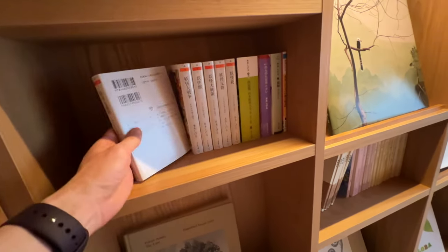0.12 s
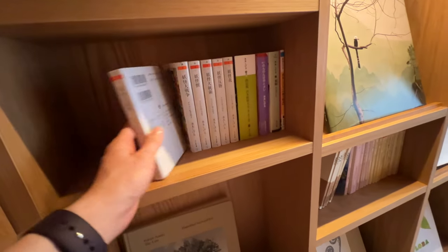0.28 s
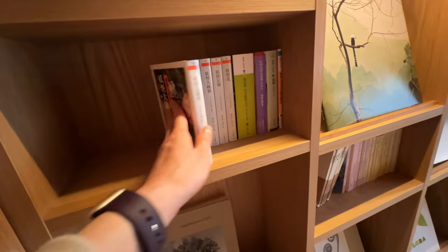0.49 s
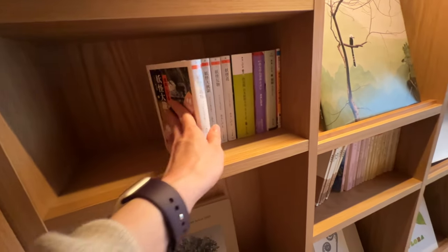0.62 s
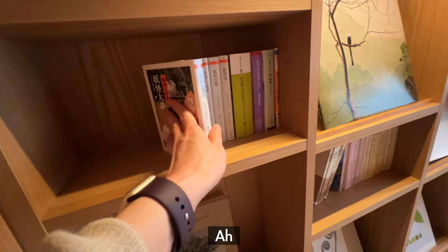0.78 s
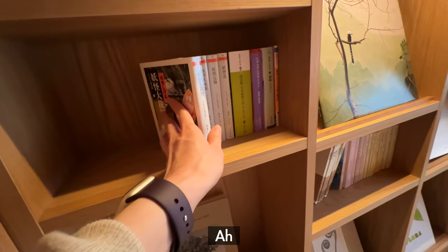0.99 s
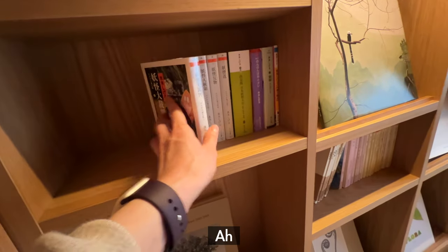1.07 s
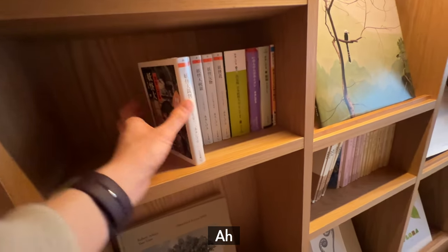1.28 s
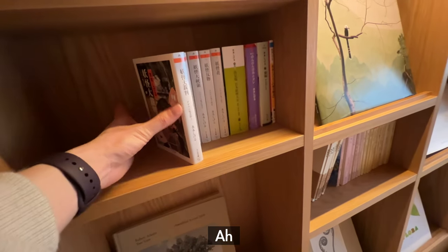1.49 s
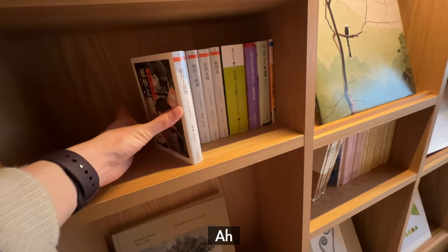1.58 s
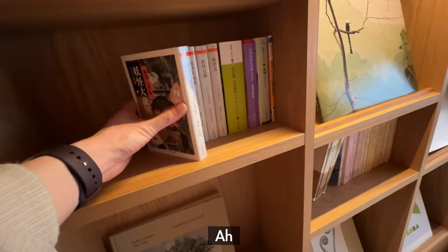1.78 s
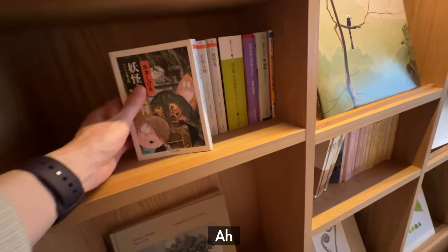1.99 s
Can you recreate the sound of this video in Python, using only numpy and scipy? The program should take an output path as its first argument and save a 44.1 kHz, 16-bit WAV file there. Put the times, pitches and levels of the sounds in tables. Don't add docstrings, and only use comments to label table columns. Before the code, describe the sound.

A paperback scrapes along a wooden shelf. Faint ticks from 0.1 seconds grow into a stuttering run of dull, hollow knocks at 0.2-0.4, loudest near 0.3, with papery rubbing fading by 0.7. A brief soft rub comes around 1.1, faint finger brushes and taps follow, then a longer slide at 1.6-1.95 and light ticks near 2.0. Close stereo, short dry room, low hum.

```python
import sys
import numpy as np
from scipy import signal
from scipy.fft import rfft, irfft, next_fast_len
from scipy.io import wavfile
from scipy.ndimage import uniform_filter1d, map_coordinates

SR = 44100
rng = np.random.default_rng(int(sys.argv[2]) if len(sys.argv) > 2 else 0)


def generate_wav(sig):
    pcm = np.round(np.clip(np.atleast_2d(sig).T, -1, 1) * 32767).astype(np.int16)
    wavfile.write(sys.argv[1], SR, pcm)


def voltage_ratio(decibels):
    exponent = np.asarray(decibels, float) / 20
    return 10 ** exponent


N = 90405
PORTS = np.array([[.5], [-.5]])


def unit(x):
    return x / np.sqrt(np.mean(x ** 2) + 1e-20)


def along(points, hz):
    point_hz, value = np.transpose(points)
    return np.interp(np.log(hz + 1), np.log(point_hz + 1), value)


def shape(points):
    return lambda hz: voltage_ratio(along(points, hz))


def wobble(rate):
    knots = rng.standard_normal(int(N * rate / SR) + 4)
    return map_coordinates(knots, [np.arange(N) * rate / SR])


def filtered(x, response):
    m = next_fast_len(N + SR // 2)
    return irfft(rfft(x, m) * response(np.fft.rfftfreq(m, 1 / SR)), m)[..., :N]


def rush(gain, alike, patchy_db):
    z = signal.stft(rng.standard_normal((2, N)), nperseg=512)[2]
    field = rng.standard_normal(z.shape[1:])
    field = uniform_filter1d(uniform_filter1d(field, 4, 0), 8, 1)
    pair = signal.istft(z * voltage_ratio(patchy_db * unit(field)), nperseg=512)[1][:, :N]

    def mid_side(hz):
        turn = np.arccos(np.clip(along(alike, hz), -1, 1)) / 2
        return gain(hz) * [np.cos(turn), np.sin(turn)]

    mid, side = filtered(pair, mid_side)
    return unit(np.array([mid + side, mid - side]))


def ring(modes, t, scatter):
    total = 0
    for (hz, db, t60, rise, pan_db, swing), extra_db in zip(modes, scatter):
        decay = voltage_ratio(db + extra_db + PORTS * pan_db - 60 * t / t60)
        total = total + swing * decay * (1 - np.exp(-t / rise)) * np.sin(2 * np.pi * hz * t)
    return total


# frequency in Hz, level in dB, t60 in seconds, rise in seconds,
# left over right in dB, swing at the start (sign, no unit).
AIR_MODES = [(115, -22, .1, .004, 0, 1), (200, -14, .06, .002, 2, 1), (285, -10, .035, .002, 0, 1),
             (352, 0, .075, .003, 2.5, 1), (420, -3, .07, .003, -5, -1), (610, -11, .035, .0012, -4, 1)]
BOARD_MODES = [(730, -5, .022, .0012, -2, 1), (815, -4, .022, .0012, -1, 1), (910, -11, .04, .0013, 0, 1),
               (1190, -6, .016, .0008, -2, 1), (1430, -9, .014, .0007, -1, 1),
               (1700, -12, .011, .0006, -2.5, 1), (2300, -16, .008, .0005, -2, 1)]
# frequency in Hz, level in dB.
TICK_SPECTRUM = [(800, -11.5), (1500, 12.5), (3000, -6.5), (6000, -6.5), (10000, -8.5), (16000, -16.5)]
# frequency in Hz, correlation (no unit).
SHELF_ALIKE = [(250, .85), (600, 0.23), (1500, 0.6), (5000, 0.077), (9000, 0.96), (16000, 0.33)]


def slips(rows, share_db):
    tick_s, boom_late_s, boom_level_db = 0.0012, .002, -2.5
    ping_level_db, ping_t60 = 6.5, 0.0079
    wood, ticks = np.zeros((2, N + SR)), np.zeros(N + SR)
    t = np.arange(SR // 8) / SR
    late = np.maximum(t - boom_late_s, 0)
    air_count = len(AIR_MODES)
    scatter_db = 2 * rng.standard_normal((len(rows), air_count + len(BOARD_MODES))) + share_db
    for (s, db, tick_db, boom_db, hz), mode_db in zip(rows, scatter_db):
        i = round(s * SR)
        if .37 < s < 1:
            mode_db[4] += 5
            mode_db[3] -= 5
        pings = [(hz * k, tick_db + ping_level_db, ping_t60, .002, 0, 1) for k in (.96, 1.04)]
        knock = ring(BOARD_MODES + pings, t, [*mode_db[air_count:], 0, 0])
        boom = voltage_ratio(boom_level_db + boom_db) * ring(AIR_MODES, late, mode_db)
        wood[:, i:i + len(t)] -= voltage_ratio(db) * (knock + boom)
        ticks[i:i + len(t)] += voltage_ratio(db + tick_db) * (t / tick_s) ** 2 * np.exp(-t / tick_s)
    return wood[:, :N] + ticks[:N] * rush(shape(TICK_SPECTRUM), SHELF_ALIKE, patchy_db=4.5)


# start in seconds, peak in dB, tick in dB, boom in dB, tick pitch in Hz.
LONG_PUSH = [(.199, -25, -1, 6.5, 6073), (.221, -21.5, -2, 8, 2384), (.251, -23.5, -0.5, 8.5, 2370),
             (.277, -11.5, -5.5, 1, 2600), (.297, -7, -16, -3, 2520), (.314, -6, -19, -6, 4485),
             (.329, -7.5, -20.5, -1, 2700), (.34, -13.5, -18, 3, 3580), (.35, -4.5, -22, -8.5, 1980),
             (.357, -13.5, -19, -1.5, 2300), (.365, -10.5, -15.5, -5, 1983), (.372, -26, -17, 7.5, 2475),
             (.383, -31, -15.5, 15.5, 2400), (.394, -19, -26, -11, 2490)]
FIRST_NUDGES = [
    (.095, -47, -5.5, 1.5, 2964),
    (.111, -35.5, -6.5, 0.5, 2210),
    (.121, -42, -4.5, 0.5, 5183),
    (.132, -40.5, 4.5, 4, 3000),
    (.145, -35, 3, 3, 5610),
]
LAST_SHOVES = [
    (1.944, -47.5, -8, 9, 1950),
    (1.966, -35, -0.5, 7, 3030),
    (1.974, -43, -3.5, 6.5, 2040),
    (1.989, -36.5, -0.5, 8.5, 2830),
    (2.0, -42.5, -19, 7.5, 2000),
    (2.015, -34, 4.5, 2, 1480),
    (2.026, -31, -9, 7, 1990),
    (2.037, -32, -5.5, 5, 1530),
]
# level in dB, air modes first, then board modes.
PUSH_SHARE = [0.2, 0.65, 1.2, 1.5, 0.5, 0.33, 0.5, 0.5, 0.5, 0.5, 0.5, 0.5, 0.5]
# level in dB, in the same order.
NUDGE_SHARE = [-0.5, 16, 17.5, -3.5, -4.5, -4.5, -7, 0.5, 7, -3, -10, -3.5, -8.5]
# level in dB, in the same order.
SETTLE_SHARE = [-12, 5, 13.5, 1, -11.5, -3, -2, -9, -17, 3, 12, -1, 0]
# level in dB, in the same order.
SHOVE_SHARE = [-5, 5, -2, 1, 5, -1.5, -6.5, 7, 6, 10, 21, -2, 19]


def pushes():
    first = slips(FIRST_NUDGES, NUDGE_SHARE) + slips(LONG_PUSH, PUSH_SHARE)
    return first + slips(LAST_SHOVES[:3], SETTLE_SHARE) + slips(LAST_SHOVES[3:], SHOVE_SHARE)


# time in seconds, pressure in dB, groan of the compartment in dB,
# singing of the cover in dB.
RUB_STROKES = [
    [(.03, -95.5, 18, 12), (.055, -82, 22, -9), (.085, -71.5, 12.5, 6), (.1, -55.5, 11, 1),
     (.15, -60.5, 6.5, 4.5), (.185, -60, 1.5, 3.5)],
    [(.27, -42, -5.5, -4), (.34, -44.5, 4.5, -36), (.41, -50.5, 11, -45), (.44, -47, 1.5, -20),
     (.48, -49.5, 2, -6), (.53, -69, 14.5, 10.5)],
    [(.56, -57, -1, -2.5), (.65, -57.5, -4.5, 2), (.69, -73, 10.5, 8), (.72, -99, 9, -1)],
    [(.97, -86.5, -5, -3), (.998, -68.5, 12.5, 4), (1.03, -74.5, 14, 5), (1.07, -58, 0, 6.5),
     (1.1, -49.5, -4.5, -4.5), (1.135, -60.5, 0.5, 9.5), (1.16, -72.5, -1.5, -10), (1.21, -96.5, 2, 7.5)],
    [(1.56, -95.5, 19.5, 5), (1.59, -70.5, 2, 3.5), (1.62, -65, 3, 0.5), (1.65, -54.5, -9, -2.5),
     (1.76, -55, -6, 0.5), (1.785, -54.5, -4, 6), (1.84, -53, -8, 8), (1.87, -51.5, -7, -3.5),
     (1.915, -60.5, -8.5, -21), (1.96, -58, 8, 3)],
]
# frequency in Hz, level in dB.
PAPER_SPECTRUM = [(150, -41), (250, -22), (802, -5.5), (1640, -5.5), (2760, -12.5), (9170, -15.5),
                  (14500, -25.5), (15900, -35.5)]
# frequency in Hz, width in Hz, level in dB.
COVER_PEAKS = [(760, 73, -6.5), (1304, 370, 8.5), (2110, 130, 4.5), (2590, 200, -1.5), (3605, 1100, -4)]
# frequency in Hz, width in Hz, level in dB.
FLAT_COVER_PEAKS = [(810, 77, 2), (1300, 220, 7.5), (1930, 70, 1.5), (2160, 89, -3), (2620, 110, -3.5),
                    (2833, 110, 1.5), (4150, 67, -14.5), (6000, 490, -10.5)]
# frequency in Hz, level in dB.
GROAN_SPECTRUM = [(120, -28.5), (200, 3), (270, -7), (380, 2.5), (550, -4.5), (800, -4), (1300, -35)]


def cover_song(peaks):
    def gain(f):
        return sum(voltage_ratio(db) / (1 + (2 * (f - centre) / width) ** 4) for centre, width, db in peaks)
    return rush(gain, SHELF_ALIKE, patchy_db=1)


def rub():
    rub_level_db, sing_level_db, groan_level_db = 3.5, -1.5, -3.5
    t = np.arange(N) / SR
    s, *columns = np.transpose(sum(RUB_STROKES, []))
    press_db, groan_db, sing_db = (np.interp(t, s, column) for column in columns)
    hollow = rush(shape(GROAN_SPECTRUM), SHELF_ALIKE, patchy_db=1.5)
    grain = voltage_ratio(1.6 * wobble(500) + .8 * wobble(60))
    paper = unit(rush(shape(PAPER_SPECTRUM), SHELF_ALIKE, patchy_db=2.5) * grain)
    song = np.where(t < 1.4, cover_song(COVER_PEAKS), cover_song(FLAT_COVER_PEAKS))
    song = unit(song * voltage_ratio(1.5 * wobble(120)))
    singing = voltage_ratio(sing_level_db + sing_db) * song
    groaning = voltage_ratio(groan_level_db + groan_db) * hollow
    return voltage_ratio(press_db + rub_level_db) * (paper + singing + groaning)


BRUSH_STARTS = [.93, 1.165, 1.25, 1.452]
# length in seconds, level in dB.
FINGER_BRUSHES = [
    (.02, -83.5),
    (.03, -64.5),
    (.045, -69.5),
    (.05, -72),
]
# frequency in Hz, level in dB.
SKIN_SPECTRUM = [(2000, -28), (4500, 1), (6000, 10), (12000, 4.5), (15500, -1.5)]
TAP_STARTS = [1.329, 1.704, .419]
# thump in dB, click in dB.
FINGER_TAPS = [
    (-47, -62),
    (-24, -56.5),
    (-18.5, -67),
]
# frequency in Hz, level in dB.
THUMP_SPECTRUM = [(30, -4.5), (120, -11), (400, -17), (1000, -48)]


def fingers():
    t, sweep, thumps, clicks = np.arange(N) / SR, np.zeros(N), np.zeros(N), np.zeros(N)
    for s, (length, db) in zip(BRUSH_STARTS, FINGER_BRUSHES):
        sweep += voltage_ratio(db) * np.sin(np.pi * np.clip((t - s) / length, 0, 1))
    for s, (thump_db, click_db) in zip(TAP_STARTS, FINGER_TAPS):
        thumps[round(s * SR)] = voltage_ratio(thump_db + 30)
        clicks += voltage_ratio(click_db - 60 * np.abs(t - s) / 0.00807) * (t > s)
    brushes = sweep * rush(shape(SKIN_SPECTRUM), SHELF_ALIKE, patchy_db=-0.5)
    clicks = clicks * rush(shape(PAPER_SPECTRUM), SHELF_ALIKE, patchy_db=6.5)
    return brushes - filtered(thumps, shape(THUMP_SPECTRUM)) + clicks


# frequency in Hz, t60 in seconds.
ROOM_T60 = [(300, 0.065), (1000, 0.18), (8000, 0.046)]


def room(x):
    hz, t, z = signal.stft(rng.standard_normal((2, SR // 2)), SR, nperseg=256)
    tail = signal.istft(z * voltage_ratio(-60 * t / along(ROOM_T60, hz)[:, None]), SR, nperseg=256)[1]
    delayed = np.pad(x, ((0, 0), (200, 0)))
    return signal.fftconvolve(delayed, tail / np.linalg.norm(tail[0]), axes=1)[:, :N]


# frequency in Hz, left ahead of right in radians.
PORT_LEAD = [(70, .2), (250, .65), (750, .6), (1050, 2.2), (1700, 3.3), (2800, 4.8), (5500, 5), (9000, 5.8),
             (13000, 6.28)]


def to_ports(x, tilt):
    return filtered(x, lambda f: voltage_ratio(PORTS * along(tilt, f)) * np.exp(1j * PORTS * along(PORT_LEAD, f)))


# frequency in Hz, level in dB.
HUM_SPECTRUM = [(12, -60.5), (20, -42.5), (32, -33), (49, -4), (123, -3.5), (147, -13.5), (214, -16.5),
                (248, -40), (400, -35), (520, -74.5), (880, -120)]
# frequency in Hz, level in dB.
HISS_SPECTRUM = [(180, -26.5), (300, -6), (425, -14), (749, -17.5), (2300, -23), (5610, -36.5),
                 (7200, -24.5), (13000, -37), (15900, -43.5)]
# frequency in Hz, left over right in dB.
BACKGROUND_TILT = [(100, 1.5), (300, 5.5), (1000, 0), (5000, 7), (8000, 12.5), (11000, -3.5)]


def air():
    hum = unit(voltage_ratio(.7 * wobble(8)) * rush(shape(HUM_SPECTRUM), [(60, 0.92)], patchy_db=1))
    hiss = rush(shape(HISS_SPECTRUM), [(3000, 0.15)], patchy_db=1.6)
    return to_ports(voltage_ratio(-52) * hum + voltage_ratio(-77) * hiss, BACKGROUND_TILT)


# frequency in Hz, left over right in dB.
SHELF_TILT = [(100, 1), (1100, 7.5), (2000, -1.5), (4600, 10), (7500, 6), (10000, -0.5)]


def scene():
    shelf = pushes() + rub() + fingers()
    shelf = shelf + voltage_ratio(-17) * room(shelf)
    return to_ports(shelf, SHELF_TILT) + air()


def top_cut(x):
    return signal.sosfilt(signal.butter(12, 16340, fs=SR, output="sos"), x)


# frequency in Hz, width in Hz, depth from 0 to 1.
TREBLE_NOTCHES = [(7710, 250, 1), (10300, 300, 1), (10700, 250, 0), (12800, 240, 0.4)]


def record(dry):
    def colour(f):
        gain = f < 15900
        for centre, width, depth in TREBLE_NOTCHES:
            gain = gain * (1 - np.clip(depth, 0, 1) / (1 + (2 * (f - centre) / width) ** 2))
        return gain

    return top_cut(filtered(dry, colour))


dry = scene()
out = record(dry)
generate_wav(out)
```